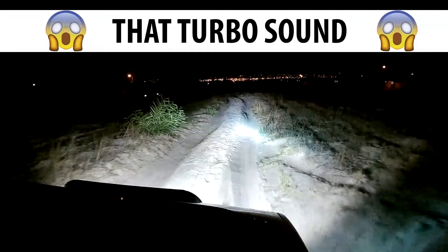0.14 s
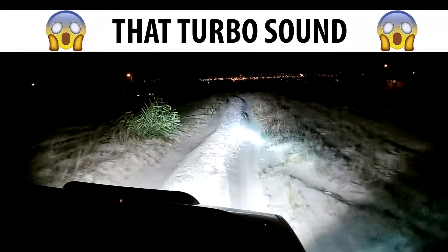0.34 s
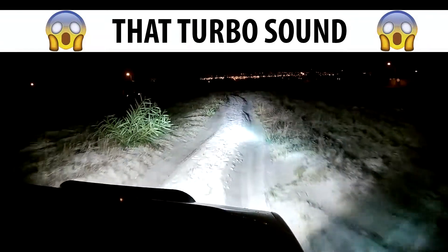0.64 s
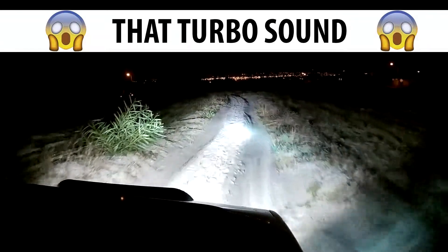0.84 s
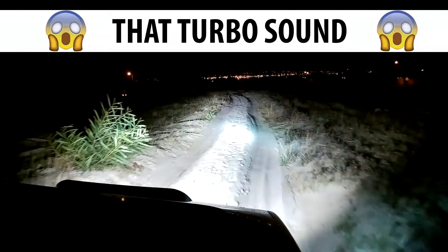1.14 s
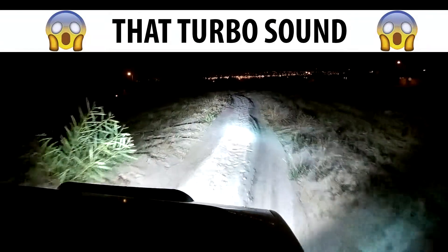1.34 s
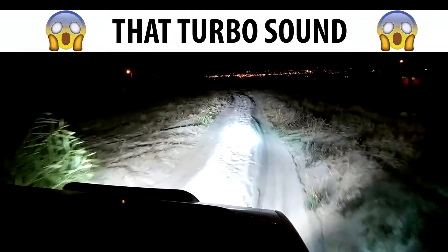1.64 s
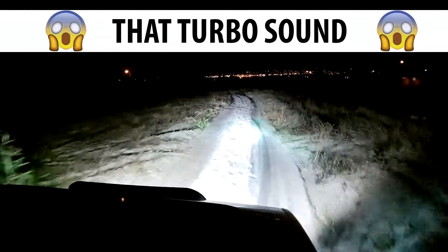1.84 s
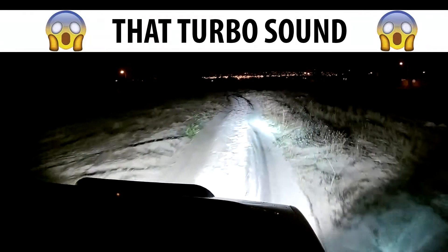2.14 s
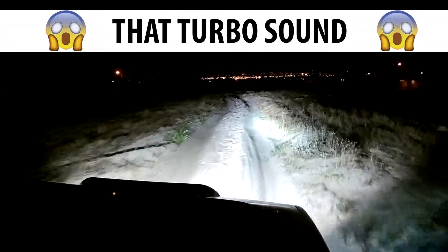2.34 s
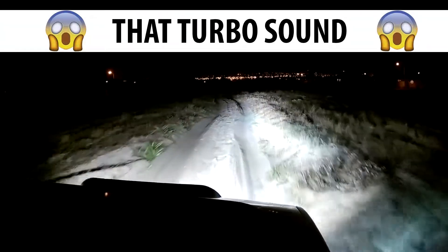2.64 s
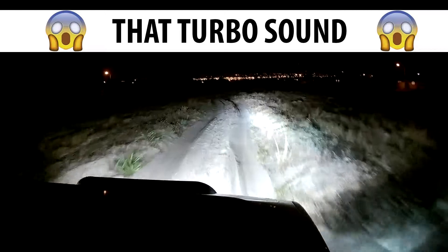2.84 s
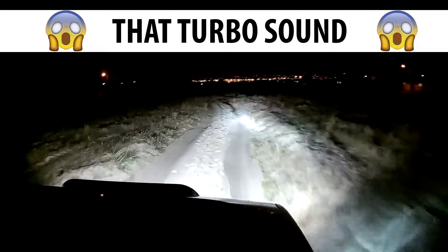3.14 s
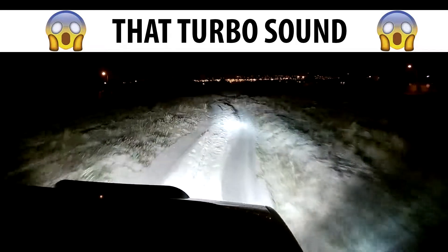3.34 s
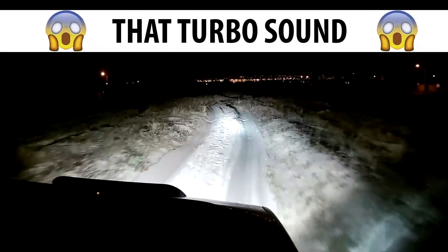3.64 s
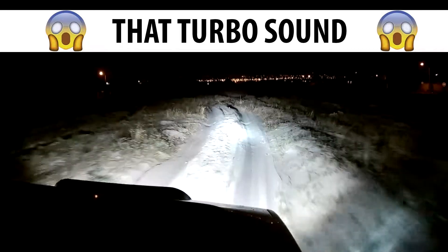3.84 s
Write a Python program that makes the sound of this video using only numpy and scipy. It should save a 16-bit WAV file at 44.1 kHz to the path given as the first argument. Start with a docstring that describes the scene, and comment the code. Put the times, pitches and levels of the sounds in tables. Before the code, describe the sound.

From on board a car outdoors, a low engine hum gives way to hard acceleration, a climbing turbo whistle and loud hiss, cut off by a sharp spit, fluttering puffs and a brief low hoot.

```python
"""On board a car on a dirt track: steady cruising, hard acceleration from 2 s, throttle shut at 3.77 s.
The V8 firing note climbs, intake air swells to a loud hiss, a turbo whistle sweeps up to 10 kHz.
Then the whistle stops and the trapped boost escapes in a chuff, dying puffs and a low hoot.
Engine, belt and turbo are sines at multiples of a rate curve; air and tyres are noise with set spectra.
"""
import sys
import numpy as np
from scipy import signal
from scipy.fft import rfft, irfft
from scipy.io import wavfile

SR = 44100
rng = np.random.default_rng(int(sys.argv[2]) if len(sys.argv) > 2 else 0)


def dump_mix(stems):
    """Bounce the given channels to the path in sys.argv[1] as a 16-bit WAV at rate SR."""
    frames = np.atleast_2d(stems).T  # one column per channel
    limited = np.clip(frames, -1, 1)  # hard clip at full scale
    pcm = np.round(limited * 32767).astype(np.int16)
    wavfile.write(sys.argv[1], SR, pcm)


N = 176400
T = np.arange(N) / SR
BIN_HZ = np.maximum(np.arange(N // 2 + 1) * SR / N, 1)

# Engine speed. Each row: time in seconds, firing rate in Hz.
FIRING_RATE = [(0, 106.2), (.6, 111), (1.3, 115.3), (1.88, 117.1), (2.03, 128.9), (2.15, 144.5),
               (2.3, 162.5), (2.5, 184.2), (2.75, 210.4), (3.0, 244.4), (3.2, 270), (3.35, 303.2),
               (3.55, 329.1), (3.76, 351), (4.0, 346.2)]
SPEED_JITTER, SPEED_JITTER_RATE_HZ = 0.0074, 7.2  # jitter as a fraction of the rate
# Firing note. Each row: time in seconds, level in dB.
FIRING_NOTE_LEVEL = [(0, -47.5), (.3, -47), (.5, -43.5), (.62, -42), (.73, -52), (.85, -43.5),
                     (1.02, -50.5), (1.15, -49), (1.33, -46), (1.45, -50), (1.62, -54.5), (1.8, -48),
                     (2.0, -51.5), (2.12, -44.5), (2.24, -51), (2.37, -49.5), (2.65, -47), (2.86, -40.5),
                     (3.08, -49.5), (3.35, -40), (3.62, -43.5), (3.85, -47.5), (4.0, -53)]
# Engine orders. Each row: multiple of the firing rate, dB re firing note at cruise, same at full load.
ENGINE_ORDERS = [(.5, -26, -9), (.75, -14, -16), (.875, -12, -18), (1, 0, 0), (1.125, -16, -17),
                 (1.34, -26, -4), (1.62, -24, -6), (2, -18, -11)]
NOTE_FLUTTER_DB, NOTE_FLUTTER_RATE_HZ = 2, 8.1
LOAD_FROM_S, LOAD_FULL_S = 2.15, 3.7
# Belt-driven parts. Each row: multiple of the firing rate, level in dB at cruise, same at full load.
BELT_LINES = [(2.63, -70, -58), (3.49, -64.5, -53.5), (4.13, -68.5, -64), (5.61, -70.5, -50)]
BELT_FLUTTER_DB, BELT_FLUTTER_RATE_HZ = 3.5, 4.6

# Noise spectra before colouring and level curves. Each row: frequency in Hz, level in dB per Hz.
ROAD_SPECTRUM = [(20, -72), (45, -77), (62, -61), (85, -61.5), (115, -58.5), (160, -64), (250, -72),
                 (500, -77), (1500, -110)]
CRUISE_SPECTRUM = [(25, -74), (100, -95), (200, -85), (380, -82.5), (600, -94.5), (1200, -92.5),
                   (2500, -102), (5000, -108), (10000, -118), (16000, -120)]
INTAKE_SPECTRUM = [(20, -92), (60, -83), (170, -66), (400, -68), (800, -72.5), (1300, -70), (2200, -73.5),
                   (3500, -75), (5500, -78.5), (9000, -81.5), (15000, -91)]
HISS_SPECTRUM = [(800, -82), (2000, -74), (3400, -72), (5000, -73), (6500, -66), (8300, -74), (10200, -70),
                 (13000, -72), (15200, -71), (16000, -74)]
BLOW_OFF_SPECTRUM = [(50, -105), (400, -97), (1500, -77.5), (2500, -73.5), (3400, -66), (4500, -70),
                     (6200, -70), (8000, -72.5), (10000, -72.5), (15000, -71.5)]
# Gains on the road, intake and compressor hiss spectra. Each row: time in seconds, gain in dB.
ROAD_GAIN = [(0, -15.5), (1.5, -13.5), (1.85, -10.5), (2.3, -3.5), (2.65, -5), (2.85, -1.5), (3.1, -2.5),
             (3.35, -4.5), (3.58, 4), (3.8, -1), (4, 6.5)]
INTAKE_GAIN = [(0, -35), (.6, -27.5), (1.15, -30.5), (1.6, -31.5), (1.85, -25), (2.05, -19), (2.25, -13.5),
               (2.5, -10.5), (2.75, -7), (3.1, -5), (3.35, -3), (3.6, 0.5), (3.78, 4), (3.86, 0.5), (4, -6)]
HISS_GAIN = [(0, -69), (1.9, -58), (2.3, -34), (2.6, -19), (2.9, -11.5), (3.16, -9.5), (3.29, 2), (3.45, 3),
             (3.6, 3.5), (3.77, 1.5), (3.82, -7), (4, -18)]
AIR_BEAT_RMS = 0.08  # rms depth of the beat in the air noise
HISS_FLICKER_DB, HISS_FLICKER_RATE_HZ = 0.65, 25
# Broad peaks and dips in tone colour. Each row: centre in Hz, width in Hz, gain in dB.
COLOUR_BELLS = [(591, 89, 7), (749, 79, 6.5), (940, 122, -6), (1503, 327, 8), (2650, 430, -5.5),
                (3322, 435, 6), (3500, 140, 0.5), (3860, 330, 11), (5400, 230, -13.5), (6115, 380, 9),
                (6540, 190, 5.5), (7380, 410, 3), (10030, 710, 5.5), (12200, 1450, -8), (13430, 450, 7),
                (13950, 400, -7)]
# Narrow cab modes. Each row: centre in Hz, width in Hz, gain in dB.
CAB_BELLS = [(1071, 20, 5), (1414, 20, 5), (1606, 34, 4.5), (2130, 34, 5.5), (2820, 37, 9), (3169, 35, 6.5),
             (3338, 150, 3.5), (3595, 64, 9), (4040, 40, 4.5), (4400, 62, 8.5), (4500, 72, 1),
             (5340, 96, 9), (6160, 67, -1.5), (7550, 180, 2)]
# Track bumps that set the body booming. Each row: peak in seconds, pitch in Hz, level in dB.
BUMPS = [(1.479, 86.6, -55), (1.72, 85.3, -47), (1.92, 80.3, -43), (2.42, 108, -49), (2.92, 106, -44),
         (3.39, 106, -33.5), (3.55, 86, -35), (3.77, 85, -32), (3.88, 86, -35)]
BUMP_RISE_S, BUMP_FALL_S = 0.044, 0.04

# Steady electrical whine. Each row: frequency in Hz, level in dB.
WHINE_LINES = [(6858, -68.5), (13717, -68.5)]
MIC_HISS_DB_PER_HZ, CUTOFF_HZ = -109.5, 15650

# Turbo. Each row: time in seconds, blade tone in Hz, level in dB before colouring.
BLADE_TONE = [(2.2, 2670, -74), (2.29, 3130, -58.5), (2.36, 3490, -65), (2.44, 4030, -65),
              (2.54, 4640, -59), (2.61, 5050, -56), (2.69, 5466, -58), (2.78, 5920, -49), (2.86, 6480, -60),
              (2.94, 7080, -49), (3.05, 7847, -57), (3.14, 8595, -40), (3.24, 9170, -41), (3.32, 9510, -37),
              (3.39, 9660, -48), (3.46, 9860, -39), (3.6, 9975, -33.5), (3.73, 10200, -31),
              (3.78, 10150, -53)]
# Turbo partials. Each row: multiple of the blade tone (below 1: shaft orders), relative level in dB.
TURBO_PARTIALS = [(1 / 3, -13), (1 / 2, -11), (2 / 3, -11), (1, 0), (2, -11)]
WHISTLE_JITTER, WHISTLE_JITTER_RATE_HZ = 0.0022, 116  # jitter as a fraction of the pitch
WHISTLE_FLUTTER_DB, WHISTLE_FLUTTER_RATE_HZ = 2.4, 11
WHISTLE_BEAT_RMS = 0.25  # rms depth of each of the two beats

# Chuff body and sharp spits (the one at 4.2 s lies past the end and is not heard).
# Each row: peak in seconds, level in dB, rise in seconds, fall in seconds.
CHUFFS = [(3.775, -22.5, 0.0077, 0.0082), (4.2, -21.5, 0.00046, 0.00086), (3.7782, -14, 0.00046, 0.001)]
CHUFF_HZ, CHUFF_WIDTH_HZ = 3355, 450
# Puffs of escaping boost. Each row: peak in seconds, gain on the spectrum in dB, fall in seconds.
PUFFS = [(3.765, 6, 0.037), (3.805, -8, 0.023), (3.847, 1.5, 0.035), (3.904, 0, 0.039), (3.959, -1.5, .03)]
PUFF_RISE_S = 0.012
# Intake pipe hoot as air flows back. Each row: time in seconds, pitch in Hz, level in dB.
HOOT = [(3.75, 650, -65), (3.795, 628, -33), (3.835, 590.8, -36.5), (3.87, 578.3, -30.5), (3.9, 573, -46.5),
        (4, 553, -41)]
HOOT_WIDTH_HZ = 26


def from_db(db):
    """Decibels to gain."""
    return 10 ** (np.asarray(db) / 20)


def in_time(rows):
    """Each column of a curve after the time column, at every sample."""
    s, *columns = np.transpose(rows)
    return [np.interp(T, s, column) for column in columns]


def under_load(cruise_db, load_db):
    """A level that moves from its cruising to its full-load value as the throttle opens."""
    return np.interp(T, [LOAD_FROM_S, LOAD_FULL_S], [cruise_db, load_db])


def drift(rate_hz):
    """Low-passed noise: random motion of mean 0, spread 1."""
    slow = irfft(rfft(rng.standard_normal(N)) / (1 + (BIN_HZ / rate_hz) ** 2), N)
    return (slow - slow.mean()) / slow.std()


def tone(hz):
    """Sine of rms 1 that follows a pitch curve from a random phase."""
    return np.sqrt(2) * np.sin(2 * np.pi * (np.cumsum(hz) / SR + rng.random()))


def narrow_noise(hz, width_hz):
    """Noise of rms 1 around a pitch: two drifts on carriers in quadrature."""
    phase = 2 * np.pi * np.cumsum(hz + 0 * T) / SR
    return drift(width_hz) * np.cos(phase) + drift(width_hz) * np.sin(phase)


def white():
    """White noise at 0 dB per Hz."""
    return rng.standard_normal(N) * np.sqrt(SR / 2)


def burst(s, rise_s, fall_s):
    """Envelope with a rounded rise and an exponential fall."""
    before, after = np.minimum(T - s, 0), np.maximum(T - s, 0)
    return np.exp(-(before / rise_s) ** 2 - after / fall_s)


def colour_db(hz):
    """Gain of the tone colour and cab modes: one bell, in dB, for each peak or dip."""
    grid_hz = np.arange(0, SR / 2, 2)
    gain_db = np.zeros(len(grid_hz))
    for centre_hz, width_hz, peak_db in COLOUR_BELLS + CAB_BELLS:
        gain_db += peak_db * 0.5 ** ((2 * (grid_hz - centre_hz) / width_hz) ** 2)
    return np.interp(hz, grid_hz, gain_db)


def air(spectrum):
    """Noise with the given spectrum, coloured by the bells."""
    hz, db = np.transpose(spectrum)
    source_db = np.interp(np.log(BIN_HZ), np.log(hz), db)
    return irfft(rfft(white()) * from_db(source_db + colour_db(BIN_HZ)), N)


def firing_rate():
    """Firing rate in Hz with a slight random jitter."""
    return in_time(FIRING_RATE)[0] * (1 + SPEED_JITTER * drift(SPEED_JITTER_RATE_HZ))


def engine(firing_hz):
    """The firing note and the side orders of uneven cylinders; each wavers in strength."""
    note_db, = in_time(FIRING_NOTE_LEVEL)
    total = np.zeros(N)
    for multiple, cruise_db, load_db in ENGINE_ORDERS:
        flutter_db = NOTE_FLUTTER_DB * drift(NOTE_FLUTTER_RATE_HZ)
        level_db = note_db + under_load(cruise_db, load_db) + flutter_db
        total += from_db(level_db) * tone(multiple * firing_hz)
    return total


def belt(firing_hz):
    """Thin, wavering lines of belt-driven parts, locked to engine speed."""
    total = np.zeros(N)
    for multiple, cruise_db, load_db in BELT_LINES:
        flutter_db = BELT_FLUTTER_DB * drift(BELT_FLUTTER_RATE_HZ)
        total += from_db(under_load(cruise_db, load_db) + flutter_db) * tone(multiple * firing_hz)
    return total


def road():
    """Tyre and body rumble, booming bumps, and the steady noise of cruising."""
    rumble = from_db(in_time(ROAD_GAIN)[0]) * air(ROAD_SPECTRUM)
    booms = np.zeros(N)
    for s, hz, db in BUMPS:
        booms += from_db(db) * burst(s, BUMP_RISE_S, BUMP_FALL_S) * tone(np.full(N, hz))
    return rumble + booms + air(CRUISE_SPECTRUM)


def induction(firing_hz):
    """Intake roar and compressor hiss, beating with the cylinders and at random."""
    motion = tone(firing_hz) + tone(firing_hz / 2) + drift(64)
    beat = 1 + AIR_BEAT_RMS * motion / np.sqrt(3)
    roar = from_db(in_time(INTAKE_GAIN)[0]) * air(INTAKE_SPECTRUM)
    hiss_db = in_time(HISS_GAIN)[0] + HISS_FLICKER_DB * drift(HISS_FLICKER_RATE_HZ)
    hiss = from_db(hiss_db) * air(HISS_SPECTRUM)
    return beat * (roar + hiss)


def electronics():
    """Microphone hiss (white) and fixed whine lines."""
    hiss = from_db(MIC_HISS_DB_PER_HZ) * white()
    return hiss + sum(from_db(db) * tone(np.full(N, hz)) for hz, db in WHINE_LINES)


def whistle(firing_hz):
    """Blade tone, octave and shaft orders sweep through the bells, roughened by the cylinders."""
    blade_hz, blade_db = in_time(BLADE_TONE)
    spinning = (T > BLADE_TONE[0][0]) & (T < BLADE_TONE[-1][0])
    blade_hz = blade_hz * (1 + WHISTLE_JITTER * drift(WHISTLE_JITTER_RATE_HZ))
    partials = np.zeros(N)
    for multiple, relative_db in TURBO_PARTIALS:
        hz = multiple * blade_hz
        flutter_db = WHISTLE_FLUTTER_DB * drift(WHISTLE_FLUTTER_RATE_HZ)
        partials += from_db(blade_db + relative_db + colour_db(hz) + flutter_db) * tone(hz)
    beat = 1 + WHISTLE_BEAT_RMS * (tone(firing_hz) + tone(2 * firing_hz))
    return spinning * partials * beat


def throttle_lift():
    """Boost escapes: a narrow-band chuff, a run of broadband puffs and a low hoot."""
    chuff_gain = sum(from_db(db) * burst(s, rise_s, fall_s) for s, db, rise_s, fall_s in CHUFFS)
    chuff = chuff_gain * narrow_noise(CHUFF_HZ, CHUFF_WIDTH_HZ)
    puff_gain = sum(from_db(db) * burst(s, PUFF_RISE_S, fall_s) for s, db, fall_s in PUFFS)
    puffs = puff_gain * air(BLOW_OFF_SPECTRUM)
    hoot_hz, hoot_db = in_time(HOOT)
    hoot = (T > HOOT[0][0]) * from_db(hoot_db) * narrow_noise(hoot_hz, HOOT_WIDTH_HZ)
    return chuff + puffs + hoot


def scene():
    """All sources at one microphone, the same in both channels."""
    firing_hz = firing_rate()
    running = engine(firing_hz) + belt(firing_hz) + road() + induction(firing_hz)
    turbo = whistle(firing_hz) + throttle_lift()
    return np.tile(running + turbo + electronics(), (2, 1))


def record(dry):
    """Steep elliptic low-pass."""
    lowpass = signal.ellip(12, 0.1, 90, CUTOFF_HZ, fs=SR, output="sos")  # 0.1 dB ripple, 90 dB stop
    return signal.sosfilt(lowpass, dry)


dry = scene()
out = record(dry)
dump_mix(out)
```